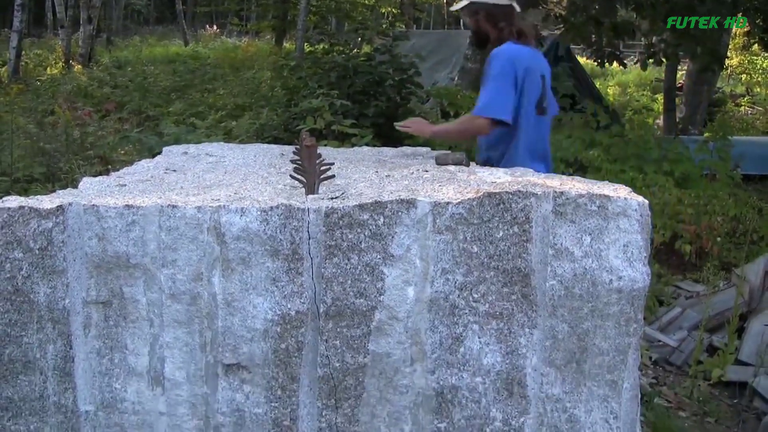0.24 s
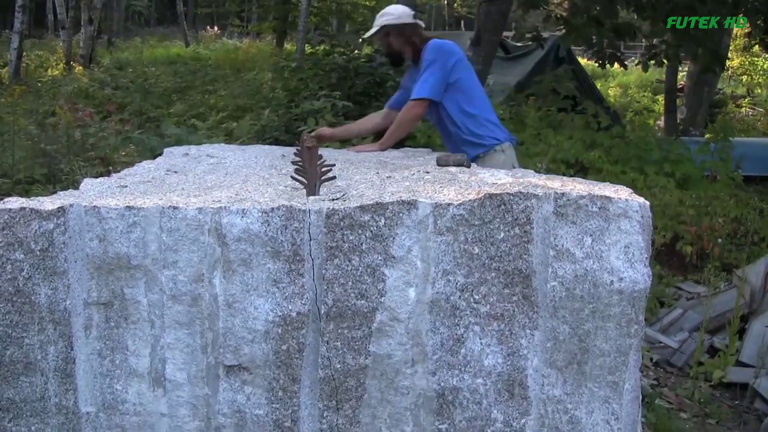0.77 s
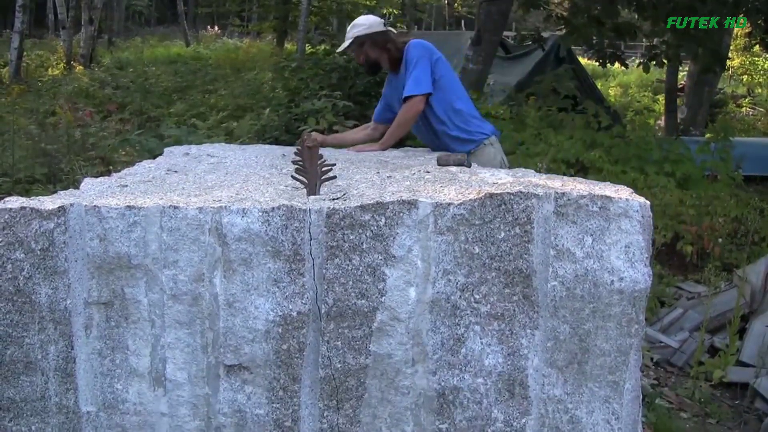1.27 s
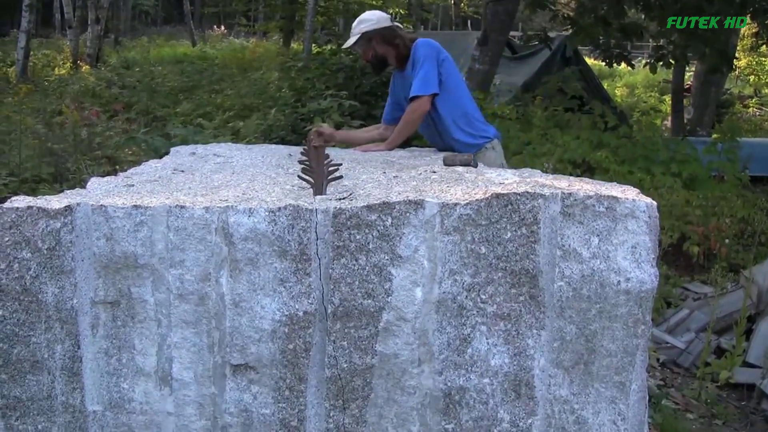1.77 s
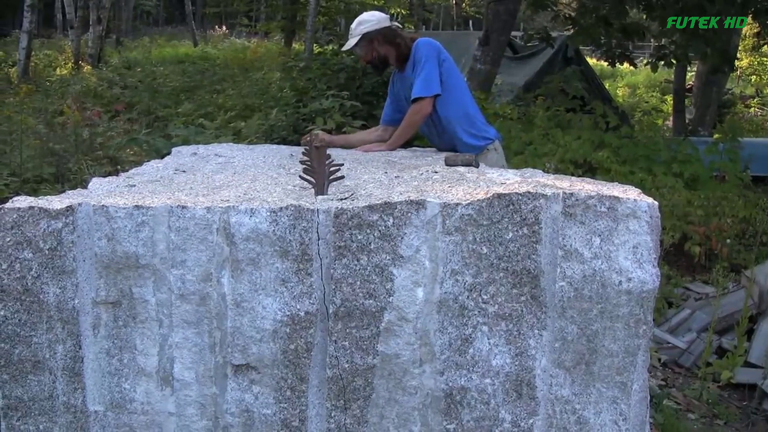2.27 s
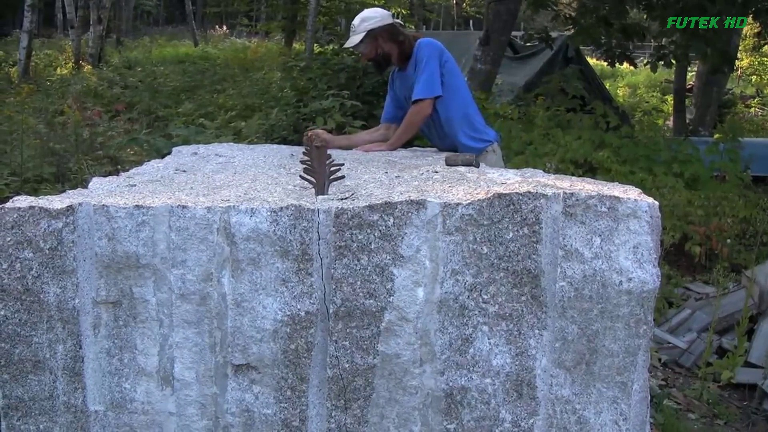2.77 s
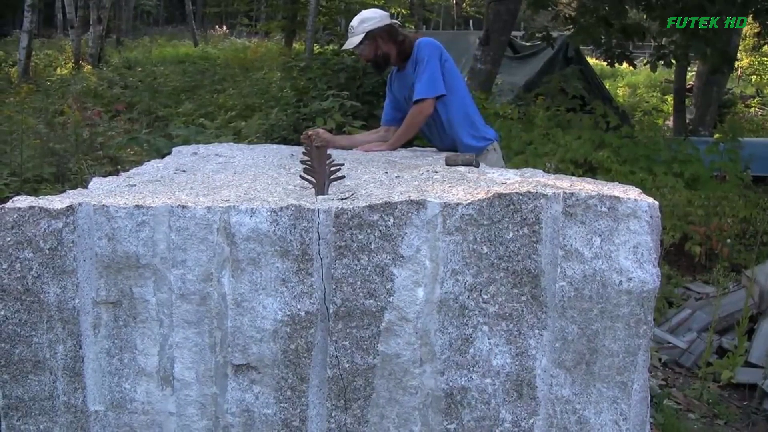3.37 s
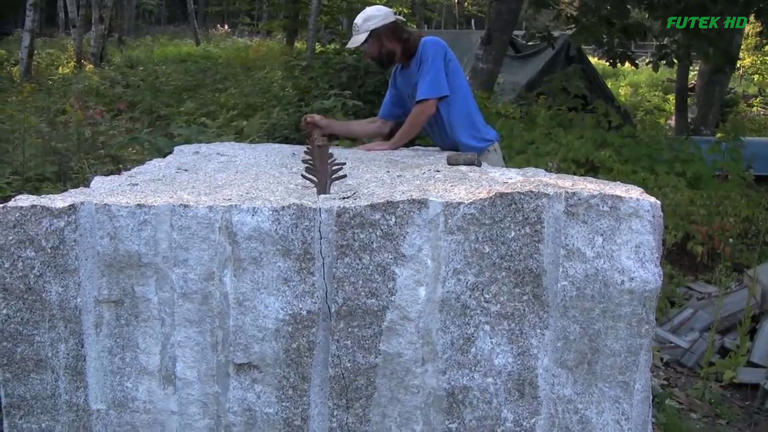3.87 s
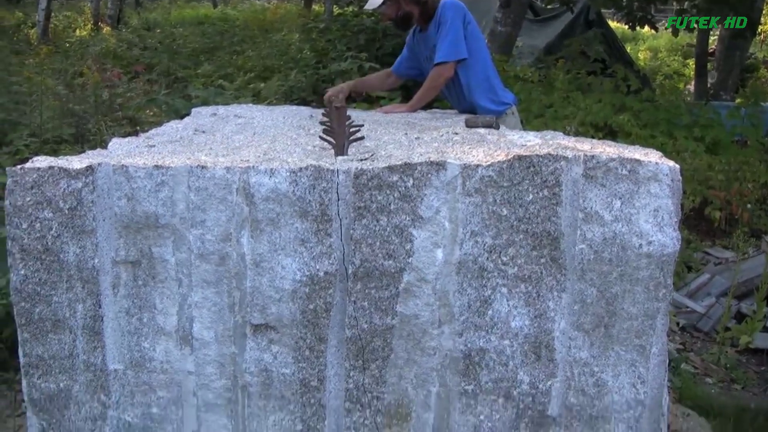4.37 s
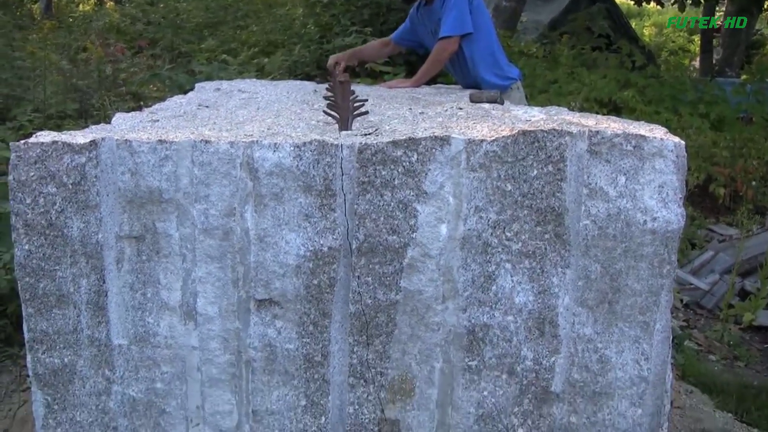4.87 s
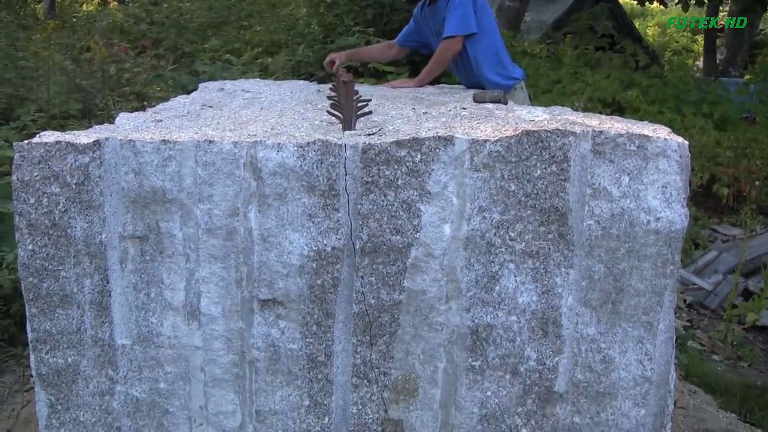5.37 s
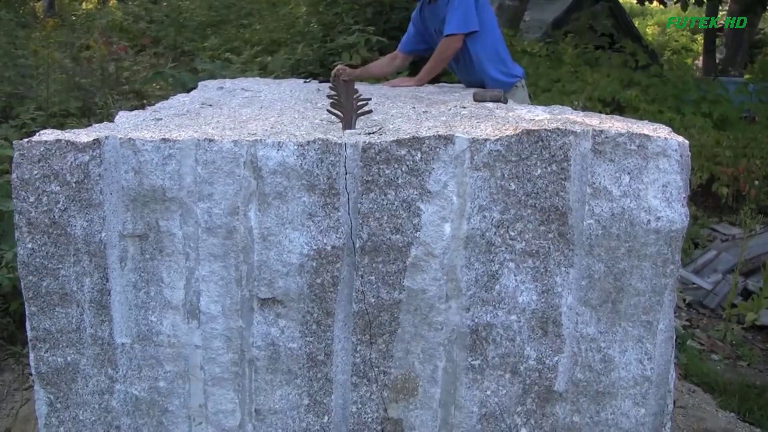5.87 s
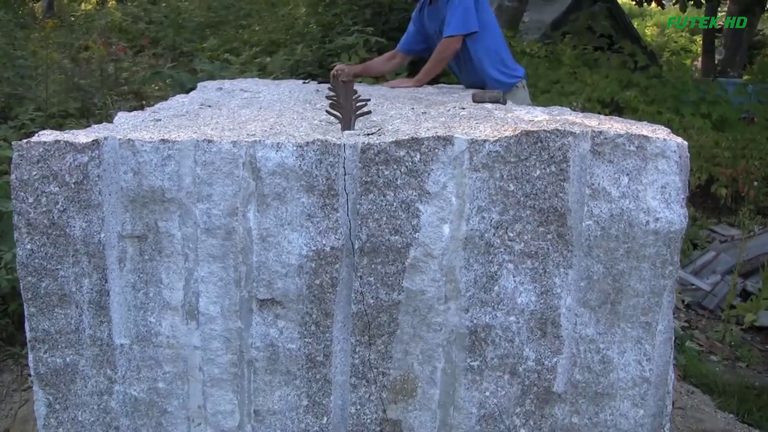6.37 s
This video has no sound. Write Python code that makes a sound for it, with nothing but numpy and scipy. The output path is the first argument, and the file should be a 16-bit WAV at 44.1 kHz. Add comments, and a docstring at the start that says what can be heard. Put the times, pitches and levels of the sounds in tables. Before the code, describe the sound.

Throughout, crickets chirr near 4.8 kHz: a close one gives triple-pulse chirps about twice a second, a fainter higher one keeps steady time, and a blurred chorus swells behind, over soft airy hiss and a very faint low hum. At 0.2-0.5 s there are dull footfalls and a brush of clothing. Slight ticks on stone follow at 1.2, 2.8 and 3.0-3.4 s. At 3.6 s a wedge scrapes shortly, knocks at 3.7, and a low thud comes at 3.9. At 4.25 s a hard double clink sets the wedge ringing near 4 kHz, wavering as it turns and fading within half a second. From 4.75 to 5.1 s a shim drags grittily with small ticks. At 5.43 s comes the sharpest, brightest clank, with a many-toned shimmering ring, grazing taps at 5.5, damped at 5.6 and fading by about 6 s. Crickets continue to the end, with slight woodland echo.

```python
"""Steel wedges and shims are reset in a row of holes on a granite block: they scrape, tick and knock on the stone.
A wedge and then a shim ring as decaying modes, swelling and fading as each piece turns in the man's hand.
Scrapes and knocks are noise and cracks through resonances; his feet and clothes are low thuds and brushed noise.
Crickets chirp in gliding sines over a blurred chorus, with hissing open air and a far hum in a wooded yard."""
import sys
import numpy as np
from scipy import signal
from scipy.fft import rfft, irfft
from scipy.io import wavfile

SR = 44100
rng = np.random.default_rng(int(sys.argv[2]) if len(sys.argv) > 2 else 0)


def pcm_store(signal):
    """Save signal as 16-bit PCM."""
    levels = np.round(np.clip(np.atleast_2d(signal), -1, 1) * 32767)
    wavfile.write(sys.argv[1], SR, levels.astype(np.int16).T)


N = 291942
TIME = np.arange(N) / SR

# Chirps of the nearest cricket, which also swell the chorus.
# Each row: middle of the first syllable in seconds, level in dB before a later lift, pitch in Hz,
# syllable spacing in seconds.
NEAREST_CHIRPS = [(.115, -44, 4810, .04), (.752, -45, 4785, .042), (1.22, -44, 4800, .042),
                  (1.787, -43.5, 4890, .042), (2.559, -45.5, 4820, .039), (3.08, -44, 4900, .041),
                  (3.534, -44.5, 4825, .041), (4.091, -45.5, 4820, .04), (4.661, -43.5, 4890, .04),
                  (5.099, -45, 4820, .042), (5.55, -45, 4950, .04), (5.994, -43.7, 4830, .041),
                  (6.37, -45, 4805, .041)]


def from_db(db):
    """Decibels to gain."""
    return 10 ** (np.asarray(db) / 20)


def rms_one(x):
    """Scale to rms 1."""
    return x / np.sqrt(np.mean(x ** 2) + 1e-20)


def in_time(rows):
    """A curve joined by straight lines, at every sample."""
    return np.interp(TIME, *np.transpose(rows))


def add(out, s, sound):
    """Mix a sound in, starting at s seconds, cut to fit the scene."""
    at = int(round(s * SR))
    sound = sound[max(-at, 0):]
    at = max(at, 0)
    out[at:at + len(sound)] += sound[:max(N - at, 0)]


def drift(rate_hz):
    """Smooth chance of spread 1 that changes about rate_hz times a second."""
    step = 40  # samples between the slow values
    settle = 2000  # slow values dropped while the filter settles
    r = np.exp(-2 * np.pi * rate_hz * step / SR)
    noise = rng.standard_normal(N // step + 2 + settle)
    slow = rms_one(signal.lfilter([1], [1, -2 * r, r * r], noise)[settle:])
    return np.interp(np.arange(N) / step, np.arange(len(slow)), slow)


def resonate(x, modes):
    """Parallel two-pole resonances, given as (Hz, width in Hz, dB), with alternating signs."""
    out = 0
    for k, (hz, width_hz, db) in enumerate(modes):
        r = np.exp(-np.pi * width_hz / SR)
        poles = [1, -2 * r * np.cos(2 * np.pi * hz / SR), r * r]
        ringing = signal.lfilter([1, 0, -1], poles, x + 1e-18)
        out = out + (-1) ** k * from_db(db) * (1 - r * r) / 2 * ringing
    return out


def coloured_noise(spectrum):
    """Noise of rms 1 with a spectrum given as (Hz, dB), joined over log frequency."""
    hz, db = np.transpose(spectrum)
    bins_hz = np.fft.rfftfreq(N, 1 / SR)
    gain = from_db(np.interp(np.log(bins_hz + 1), np.log(hz), db))
    return rms_one(irfft(rfft(rng.standard_normal(N)) * gain, N))


def woods(x, t60):
    """Sparse, decaying echoes scattered back by trunks and leaves; t60 in seconds."""
    t = TIME[:SR // 2]
    sparse = rng.standard_normal(len(t)) * (rng.random(len(t)) < .02)
    echoes = sparse * from_db(-60 * t / t60) * (t > .006)
    return signal.fftconvolve(x, echoes / np.sqrt(np.sum(echoes ** 2)))[:N]


def yard(air_db=-68.0):
    """Faint hiss of leaves and distant insects, as shaped noise, over slowly wavering sines of a far hum."""
    # Spectrum of the open air. Each row: frequency in Hz, relative density in dB per Hz.
    air_spectrum = [(20, -2), (32, -4.5), (48, -13), (75, -20.5), (115, -14.5), (160, -11), (320, -6.5),
                    (700, -11.5), (1500, -13.5), (2500, -11.5), (3600, -7), (5500, -11.5), (7000, -18),
                    (10000, -23), (15000, -28.5)]
    # Partials of the far hum. Each row: frequency in Hz, middle rms level in dB.
    hum_partials = [(30, -73), (60, -87), (150, -87)]
    hum = np.zeros(N)
    for hz, db in hum_partials:
        level = from_db(db + 1.1 * drift(5.3)) * np.sqrt(2)
        hum += level * np.sin(2 * np.pi * hz * TIME + 0.12 * drift(3))
    return from_db(air_db) * coloured_noise(air_spectrum) + hum


def add_chirp(out, s, db, hz, spacing, syllables, first_db, octave_db,
              length=0.025, fall_hz_per_s=24000, rise_hz=30):
    """Each wing stroke is a near sine whose pitch falls as the scraper slows.

    Strokes grow louder and higher through a chirp, and lower voices take longer ones.
    """
    length = length * (4900 / hz) ** 3  # length is given for a 4900 Hz voice
    t = np.arange(-length / 2, length / 2, 1 / SR)
    # the scraper bites fast and eases off
    swell = np.abs(np.sin(np.pi * np.linspace(0, 1, len(t)) ** 0.92)) ** 1.25
    for k in range(syllables):
        late, sharp, loud, steep = rng.standard_normal(4)
        stroke_hz = hz + rise_hz * k + 25 * sharp
        fall = fall_hz_per_s * (1 + 0.2 * steep)
        phase = 2 * np.pi * (stroke_hz * t - fall * t * t / 2)
        stroke = swell * from_db(db + 0.52 * loud + first_db / (k + 1) ** 2)
        tone = np.sin(phase) + from_db(octave_db) * np.sin(2 * phase)
        add(out, s + k * spacing + .0005 * late - length / 2, stroke * tone)


def chorus(level_db=-60.8, swell_db=4, swell_width_s=.08):
    """Many far crickets, blurred by the trees, swell whenever the nearest one chirps."""
    far = np.zeros(N)
    voices = rng.uniform(-1.1, 1, size=(170, 4))
    for k, (when, size, pitch, tempo) in enumerate(voices):
        s = (k + when) / len(voices) * (TIME[-1] + .2) - .2
        add_chirp(far, s, 3 * size, 4710 + 260 * pitch, .04 + .004 * tempo, 4, first_db=-3, octave_db=-26,
                  length=.027, fall_hz_per_s=29000, rise_hz=10)
    swelling = sum(np.exp(-((TIME - s) / swell_width_s) ** 2) for s, *_ in NEAREST_CHIRPS)
    blurred = rms_one(far + 0.6 * woods(far, t60=0.18))
    return blurred * from_db(level_db + swell_db * swelling)


def crickets():
    """A few near crickets, each with its own voice and pace, stand out from the chorus."""
    # The high voice, nearly steady. Each entry: middle of the first syllable in seconds.
    high_times = [.0, .45, .841, 1.245, 1.672, 2.107, 2.53, 2.955, 3.381, 3.804, 4.222, 4.668, 5.115, 5.54,
                  5.965, 6.40]
    # The low voice, uneven. Each entry: middle of the first syllable in seconds.
    low_times = [.495, .652, 1.05, 1.37, 1.895, 2.325, 2.69, 2.795, 3.31, 3.675, 3.95, 4.51, 4.82, 5.67,
                 6.105, 6.285, 6.52]
    near = np.zeros(N)
    for s, db, hz, spacing in NEAREST_CHIRPS:
        add_chirp(near, s, db, hz, spacing, syllables=3, first_db=-4.5, octave_db=-37.5)
    for s in high_times:
        add_chirp(near, s, db=-51.8, hz=5170, spacing=.0472, syllables=3, first_db=-3.5, octave_db=-37.5)
    for s in low_times:
        add_chirp(near, s, db=-53.5, hz=4690, spacing=.04, syllables=3, first_db=-2.5, octave_db=-37.5)
    near *= from_db(3.5 + 2.2 * drift(200))  # a lift, and the teeth of the file catch unevenly
    return near + from_db(-9) * woods(near, t60=0.32) + chorus()


def worker(brush_attack_s=.02):
    """Dull footfalls on soil, as low sines with noise, and the brush of clothes and grass, as shaped noise."""
    # Footfalls. Each row: start in seconds, level in dB, pitch in Hz, decay time constant in seconds.
    footfalls = [(0.275, -58, 132, 0.013), (0.307, -68, 84, 0.035), (.38, -68.5, 97, .03),
                 (1.41, -77.5, 92, 0.14), (2.264, -74, 90, .08), (3.26, -77, 97, 0.06),
                 (3.875, -59.5, 42.4, 0.043), (3.894, -72, 190, .02), (4.97, -68.5, 99, 0.026),
                 (5.8, -77, 95, 0.14), (6.49, -76, 84.6, 0.1)]
    # Clothes and grass. Each row: start in seconds, level in dB, decay time constant in seconds.
    brushes = [(.2, -65, .035), (.36, -70.5, .18), (1.39, -72, .14), (5.82, -74, .05)]
    feet, brushing, t = np.zeros(N), np.zeros(N), TIME[:SR // 2]
    for s, db, hz, length in footfalls:
        broad = [(hz, hz, 0)]  # as wide as its pitch
        soil = rms_one(resonate(resonate(rng.standard_normal(len(t)), broad), broad))
        thud = np.sin(2 * np.pi * hz * t) + 0.87 * soil
        add(feet, s, from_db(db) * thud * np.minimum(t / .005, 1) * np.exp(-t / length))
    for s, db, length in brushes:
        swell = np.minimum(t / brush_attack_s, np.exp((brush_attack_s - t) / length))
        add(brushing, s, from_db(db) * swell)
    brush = coloured_noise([(100, -36), (400, -9), (900, -3.5), (1300, -8), (2200, -18.5), (9000, -30)])
    return feet + brush * brushing * from_db(2.5 * drift(40))


def scrape(drag, modes, grains_per_s=1300, spread_db=2):
    """Steel catches on crystal after crystal, and each slip rings it briefly."""
    slips = (rng.random(N) < grains_per_s / SR) * rng.standard_normal(N)
    grains = slips * from_db(spread_db * drift(90))
    touching = (TIME > drag[0][0]) & (TIME < drag[-1][0])
    return rms_one(resonate(grains, modes)) * from_db(in_time(drag)) * touching


def scrapes():
    """A wedge and a shim are dragged over the stone, then the ringing shim grazes it."""
    # Level curves of the two drags and the graze. Each row: time in seconds, level in dB.
    wedge_drag = [(3.57, -97), (3.615, -62.5), (3.645, -56.5), (3.68, -59.5), (3.72, -84)]
    shim_drag = [(4.72, -89), (4.78, -63.5), (4.85, -69.5), (4.93, -67), (4.96, -55), (4.985, -68.5),
                 (5.02, -62.5), (5.06, -62.5), (5.10, -92)]
    shim_graze = [(5.425, -104), (5.435, -70), (5.5, -61.5), (5.56, -66.5), (5.65, -77), (5.78, -86)]
    # Resonances damped by hand and stone. Each row: frequency in Hz, width in Hz, relative level in dB.
    held_wedge = [(1790, 70, 0), (2570, 79, -2), (4060, 114, 3), (6560, 320, -11.5), (9160, 200, -13.5),
                  (10900, 200, -21)]
    held_shim = [(835, 300, -9), (2030, 140, -4.5), (2620, 120, 0.5), (5830, 210, -1), (6630, 120, -3),
                 (7300, 370, -6.5), (8170, 470, -10.5), (9900, 59, -7), (13200, 300, -23)]
    return scrape(wedge_drag, held_wedge) + scrape(shim_drag, held_shim) + scrape(shim_graze, held_shim)


def knocks(falloff_db=12.0, crack=5.2):
    """Each contact is a crack and crushing grit; where it lands decides which resonances answer most."""
    # Hard contacts. Each row: start in seconds, peak level in dB, strongest frequency in Hz,
    # 60 dB decay time of the grit in seconds.
    contacts = [(1.209, -53, 1500, 0.018), (2.7665, -45, 2720, 0.02), (3.008, -55, 2930, 0.036),
                (3.256, -51.5, 1250, 0.085), (3.361, -53, 2820, 0.027), (3.733, -48.5, 6200, 0.047),
                (3.738, -41.5, 1640, 0.037), (3.889, -43, 6950, 0.01), (4.2397, -42, 1800, 0.012),
                (4.271, -29.5, 2310, 0.013), (4.2728, -41, 1300, 0.014), (4.282, -44, 2400, 0.012),
                (4.44, -49.5, 2340, 0.014), (4.80, -56, 7000, 0.023), (4.953, -49, 6400, .035),
                (4.993, -49, 6800, .02), (5.017, -43, 7700, 0.053), (5.4274, -31, 7000, .04),
                (5.4318, -23, 5200, 0.02), (5.502, -47, 2220, 0.053), (5.544, -42, 2520, 0.032)]
    # Short ring of steel pressed on granite. Each row: frequency in Hz, width in Hz,
    # level in dB before the falloff per octave from the strongest frequency.
    pressed_modes = [(710, 330, 2), (1320, 520, -1), (1850, 650, -2), (2790, 530, 3), (4090, 300, -1),
                     (6350, 910, -1.5), (7360, 1800, -6), (9560, 640, -4.5), (12600, 2400, -13)]
    out, t = np.zeros(N), TIME[:SR // 8]
    for s, db, centre, t60 in contacts:
        grit = rng.standard_normal(len(t)) * from_db(-60 * t / t60)
        force = grit + crack * (t == 0)
        answering = [(hz, width, level - falloff_db * abs(np.log2(hz / centre)))
                     for hz, width, level in pressed_modes]
        knock = resonate(force, answering)
        add(out, s, from_db(db) * knock / np.abs(knock).max())
    return out


def steel(piece, modes, lobes, turn, catch_at_s, catch_loss_db, chatter_db, null_db, contact_s, catch_s=.02):
    """Free modes of a small steel piece; turning sweeps each mode's lobes and nulls past the listener."""
    # Steel on steel. Each row: start in seconds, piece, level in dB before the lobe gain,
    # share of the free ring time that the grip leaves, brightness in dB per octave from the strongest mode.
    strikes = [(3.738, "wedge", -50, .17, 7), (4.2385, "wedge", -39, 1.0, 2.5),
               (4.271, "wedge", -30.5, 1.0, 0), (4.2721, "wedge", -25, .025, -3),
               (5.4277, "shim", -39, .16, 0), (5.431, "shim", -39, 1.0, .3), (5.432, "wedge", -39, .7, -3),
               (5.502, "shim", -42, .6, -1), (5.544, "shim", -48, .5, -1), (5.719, "shim", -54.5, .12, -14),
               (5.948, "shim", -66, .17, -3.5)]
    out, t, turned = np.zeros(N), TIME[:SR], in_time(turn)
    # the fingers close on the piece and take some of its ring
    caught_db = -catch_loss_db * np.clip((TIME - catch_at_s) / catch_s, 0, 1)
    for k, (hz, mode_db, t60) in enumerate(modes):
        octaves = abs(np.log2(hz / modes[0][0]))
        swing = np.zeros(N)
        for s, struck, db, grip, bright_db in strikes:
            if struck == piece:
                decay_db = -60 * t / (t60 * grip)
                ring = from_db(db + mode_db + bright_db * octaves + decay_db)
                add(swing, s, np.minimum(t / contact_s, 1) * ring)
        density, offset, lobe_db = lobes[min(k, len(lobes) - 1)]
        # changes sign at each null, which reflections partly fill
        facing = np.sin(np.pi * (density * turned + offset))
        phase = 2 * np.pi * hz * TIME
        tone = facing * np.sin(phase) + from_db(null_db) * np.cos(phase)
        # grazing the stone roughens the high modes most
        rough_db = chatter_db * hz / 6000 * drift(110)
        out += swing * tone * from_db(lobe_db + caught_db + rough_db)
    return out


def wedge():
    """The struck wedge rings in a few modes, led by one near 4 kHz, while it turns in the hand."""
    # Modes, led by the strongest; the others in no strict order of level.
    # Each row: frequency in Hz, relative level in dB, free 60 dB decay in seconds.
    wedge_modes = [(3970, 0, .58), (6416, -22, .7), (9455, -36, .85), (10860, -35, .45), (14700, -46, .45)]
    # Radiation of the modes in order, the last row for all the rest.
    # Each row: lobes per lobe of the strongest mode, offset in lobes, gain on a lobe in dB.
    wedge_lobes = [(1.0, 0, 3.5), (1.1, -.22, 4), (.95, .6, 4.5), (1.2, .9, 3.5)]
    # Turning in the hand. Each row: time in seconds, lobes of the strongest mode gone past.
    wedge_turn = [(3.74, -.3), (4.28, .2), (4.315, .47), (4.34, .66), (4.36, .91), (4.412, 1.0),
                  (4.503, 2.0), (4.545, 2.45), (5.51, 3.94)]
    return steel("wedge", wedge_modes, wedge_lobes, wedge_turn, catch_at_s=4.34, catch_loss_db=1.8,
                 chatter_db=1.2, null_db=-16, contact_s=.0005)


def shim():
    """The struck shim rings in many modes, led by one near 2.6 kHz, while it turns in the hand."""
    # Modes, led by the strongest; the others in no strict order of level.
    # Each row: frequency in Hz, relative level in dB, free 60 dB decay in seconds.
    shim_modes = [(2602, 0, .8), (5234, -2, .6), (6782, -9, .53), (2131, -2, .3), (8420, -13, .43),
                  (9751, -18, .65), (9508, -19, .3), (12815, -17, .37), (4743, -19, .4), (10840, -33, .28),
                  (11580, -32, .28), (13120, -28, .3), (14850, -33, .4), (15375, -28, .25)]
    # Radiation of the modes in order, the last row for all the rest.
    # Each row: lobes per lobe of the strongest mode, offset in lobes, gain on a lobe in dB.
    shim_lobes = [(1.0, 0, 9), (.79, .1, 10), (.45, .92, 11.8), (.75, .13, 3.3), (.65, .1, 8.5),
                  (.6, .2, 9.7)]
    # Turning in the hand. Each row: time in seconds, lobes of the strongest mode gone past.
    shim_turn = [(5.43, .06), (5.47, .15), (5.495, .75), (5.512, 1.0), (5.535, 1.38), (5.6, 1.62),
                 (5.627, 2.0), (5.71, 3.02), (5.765, 4.02), (5.9, 3.95), (5.96, 4.5)]
    return steel("shim", shim_modes, shim_lobes, shim_turn, catch_at_s=5.605, catch_loss_db=3.5,
                 chatter_db=1.8, null_db=-23, contact_s=.003)


def scene():
    """The work on the block, lightly echoed, among the crickets."""
    work = wedge() + shim() + knocks() + scrapes()
    echoed = work + from_db(-19) * woods(work, t60=0.46)
    return (echoed + crickets() + worker() + yard())[None]


def record(dry):
    """The top is cut steeply above 15.5 kHz."""
    low_pass = signal.ellip(10, .1, 80, 15500, fs=SR, output="sos")
    return signal.sosfilt(low_pass, dry)


dry = scene()
out = record(dry)
pcm_store(out)
```